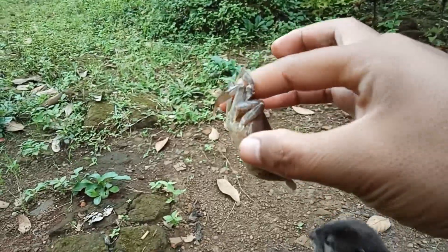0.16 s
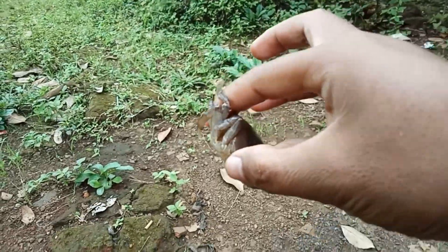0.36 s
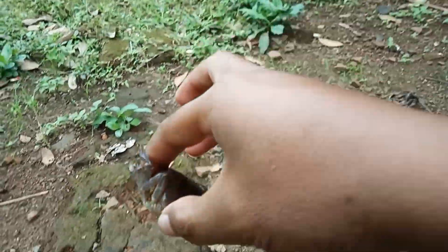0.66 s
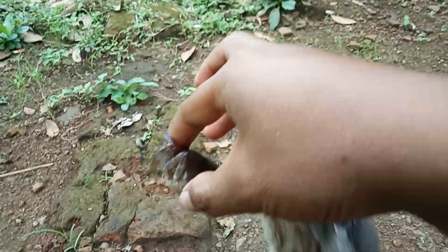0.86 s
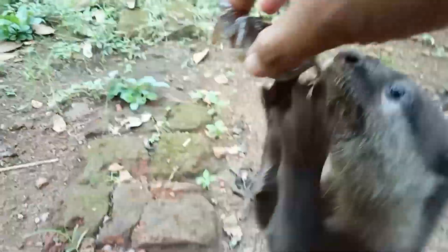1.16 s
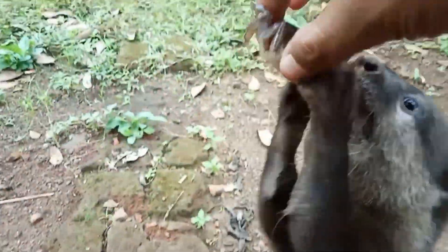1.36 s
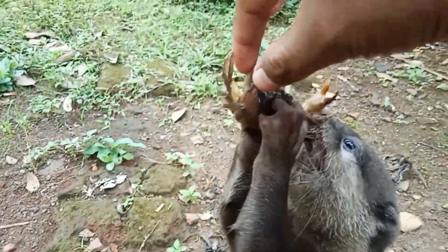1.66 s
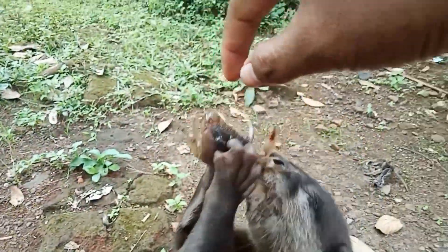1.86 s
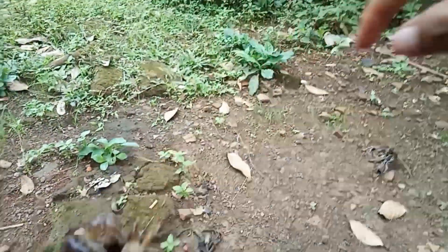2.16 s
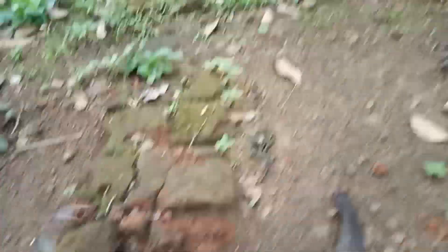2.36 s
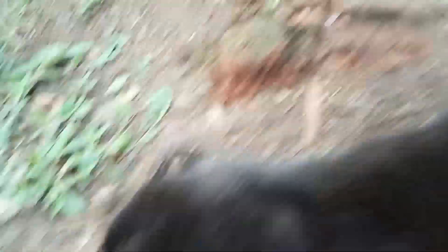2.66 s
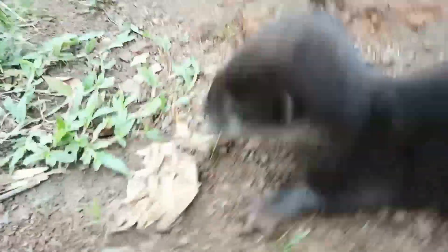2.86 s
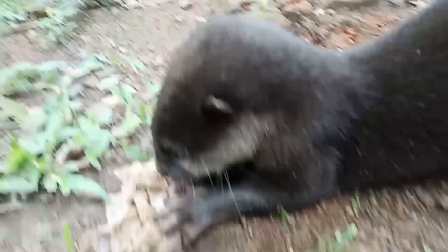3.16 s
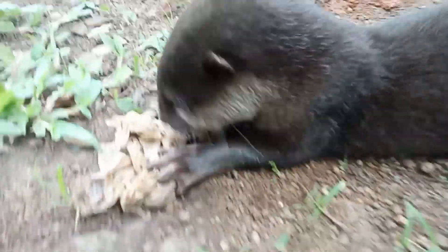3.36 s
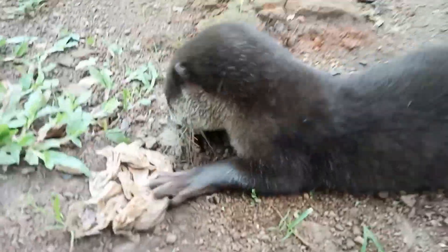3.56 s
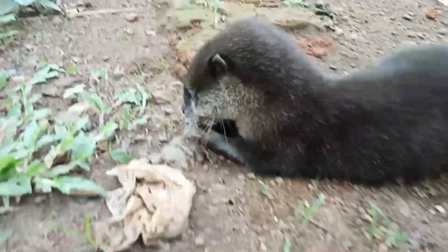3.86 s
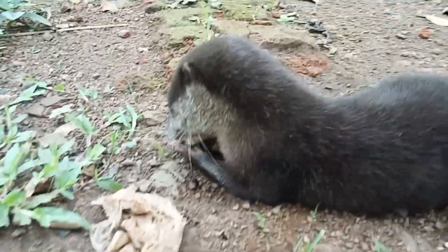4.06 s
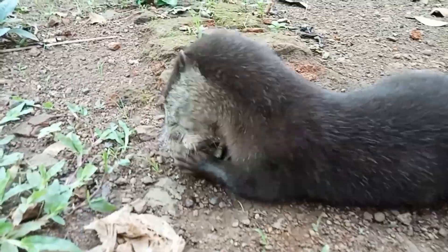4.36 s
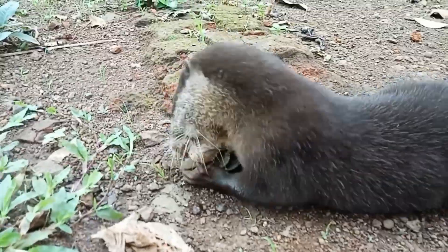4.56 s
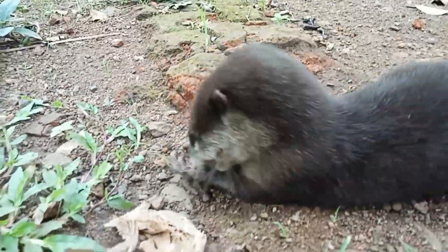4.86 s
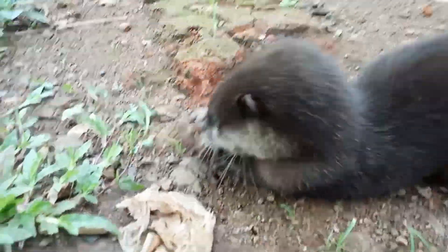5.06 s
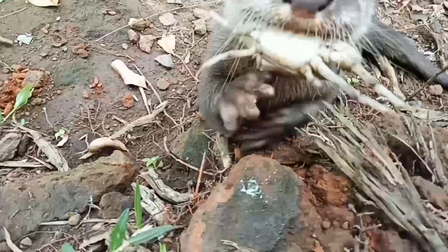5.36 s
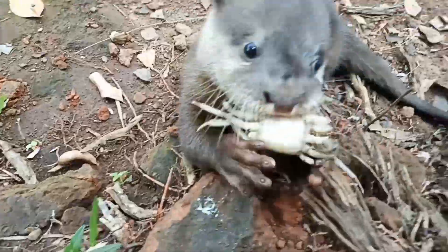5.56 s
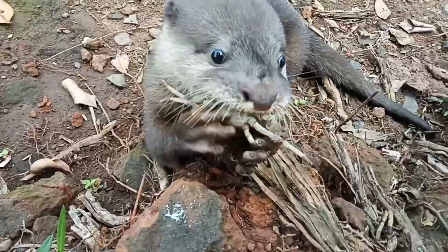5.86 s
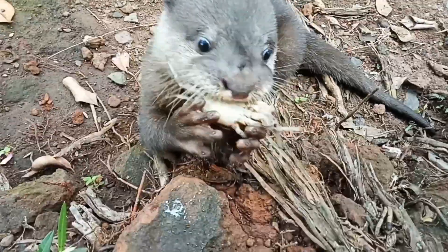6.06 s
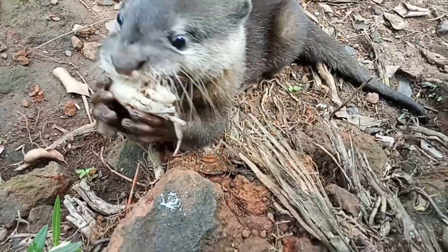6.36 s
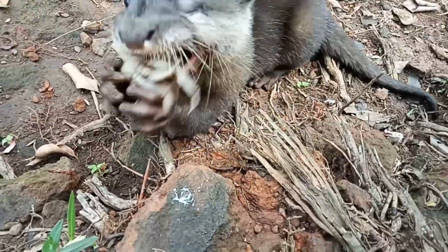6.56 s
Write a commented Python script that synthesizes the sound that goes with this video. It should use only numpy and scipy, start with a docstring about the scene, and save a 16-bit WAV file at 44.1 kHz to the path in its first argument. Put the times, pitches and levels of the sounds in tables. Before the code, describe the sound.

A few dry scrapes over quiet garden air lead to one piercing, swooping otter squeal, under a second long, ending in a raspy cracked yelp. The background is then fuller, with rumble, hiss, faint whine and far engine pulses. Paws scuff, a weak chirp slides down, something bumps softly. The air cuts out briefly, then close crisp cracks, crumbs and wet little smacks in a calmer spot.

```python
"""Garden, close microphone: a small otter begs for food and scuffs the dry ground from the start.
At 1.5 s a long swooping squeal, a whistle sliding through fixed resonances, cracks into a harsh yelp.
More scuffs, a faint falling chirp at 4.3 s and a soft bump follow, all noise bursts but the chirp.
Behind are rumble, high hiss, a thin far whine of tone and noise, and a distant engine's pulsed booms.
They fade by 5.33 s; after a short gap, in quieter air, bites, crumbs and chewing ring as noise bursts."""
import sys
import numpy as np
from scipy import signal
from scipy.fft import rfft, irfft, next_fast_len
from scipy.io import wavfile
from scipy.ndimage import uniform_filter1d

SR = 44100
rng = np.random.default_rng(int(sys.argv[2]) if len(sys.argv) > 2 else 0)


def master(y):
    """Save y as 16-bit WAV."""
    cut = np.clip(np.atleast_2d(y).T, -1, 1)
    pcm = np.round(cut * 32767)  # scale
    wavfile.write(sys.argv[1], SR, pcm.astype(np.int16))


N = 295504
TIME = np.arange(N) / SR

# Levels in the tables are taken before the trims and resonances in the functions.
# The squeal is held high, dips into a warble, climbs again and plunges: [t/s, f/Hz before any crack]
SQUEAL_PITCH = [(1.513, 5000), (1.538, 7610), (1.555, 7540), (1.573, 6380), (1.615, 6500), (1.682, 6580),
                (1.712, 7450), (1.739, 7810), (1.757, 6320), (1.797, 4270), (1.839, 3500), (1.859, 2763),
                (1.903, 2690), (1.934, 3570), (1.949, 3086), (1.961, 3390), (1.971, 3260), (2.000, 4120),
                (2.032, 3596), (2.08, 4385), (2.105, 5050), (2.143, 4950), (2.174, 6080), (2.19, 5930),
                (2.225, 3920), (2.259, 2360), (2.286, 2302), (2.32, 1865), (2.361, 1638), (2.369, 1840),
                (2.375, 1760)]
# How hard the squeal is pushed: [t/s, level/dB]
SQUEAL_EFFORT = [(1.51, -38), (1.56, -28), (1.615, -20), (1.69, -30), (1.745, -28.5), (1.81, -25.5),
                 (1.9, -23), (1.92, -24.5), (2.055, -21.5), (2.066, -30), (2.2, -21), (2.238, -17),
                 (2.249, -9.5), (2.258, -19.5), (2.284, -15), (2.295, -17), (2.31, -15), (2.318, -23.5),
                 (2.366, -27.5), (2.378, -36.5)]
# The chirp flicks up and slides down: [t/s, f/Hz, level/dB]
CHIRP = [(4.306, 4910, -35), (4.328, 7040, -43.5), (4.342, 6440, -48), (4.366, 6150, -34),
         (4.39, 5550, -38), (4.41, 5300, -38), (4.437, 3710, -42.5), (4.467, 3650, -45.5),
         (4.488, 2900, -39), (4.505, 2730, -51), (4.521, 2460, -37.5), (4.538, 2210, -48)]
# Fixed resonances that each harmonic slides through: [f/Hz, level/dB]
VOICE_COLOUR = [(1100, -3.5), (1700, 0.5), (2300, 4.5), (2750, 7), (3200, 0.5), (4100, -3), (4500, -15),
                (5350, -22), (5900, -5.5), (6450, 1), (7600, -3), (8800, -5), (11000, -13.5), (13500, -15),
                (15500, -14.5)]
# Rasp in the throat: [f/Hz, relative level/dB per Hz]
RASP = [(1100, -44), (1700, -22), (2400, 8), (3500, 3), (4800, -17), (6300, -6.5), (7800, -20),
        (10000, -12.5), (15500, -33)]
# Hoarse stretches: [start t/s, end t/s, roughness added (0-1)]
HOARSE = [(1.517, 1.55, 0.13), (1.772, 1.787, 0.02), (2.081, 2.158, 0.4), (2.203, 2.243, 0.4),
          (2.25, 2.294, 0.4), (4.303, 4.535, 0.06)]
# The voice cracks upward and gains tones at half pitch:
# [start t/s, end t/s, change of level/dB, half-pitch tone level/dB]
CRACKS = [(2.267, 2.274, -3, -4), (2.288, 2.383, 1.5, -11)]
CRACK_RATIO = 1.333  # about a fourth up
CLEAR_ROUGHNESS, HOARSE_ONSET_S, VOICE_ONSET_S = 0.021, 0.015, 0.0092
RELAXED_HZ, TENSION_DB_PER_OCTAVE = 3200, 16.5  # upper harmonics brighten as the pitch rises

# Scuffs of paws and food: [peak t/s, level/dB, attack/s, 60 dB decay/s]
SCUFFS = [(.037, -36.5, 0.046, 0.21), (0.542, -34, .002, 0.029), (.792, -35, .016, 0.14),
          (0.825, -29.5, 0.0035, 0.12), (1.368, -30.5, 0.0014, 0.12), (2.615, -33.5, 0.0088, .19),
          (2.75, -32.5, .012, .17), (2.776, -28, 0.019, 0.094), (5.468, -32, 0.015, .1)]
# Grit of the scuffs: [f/Hz, relative level/dB per Hz]
SCUFF_COLOUR = [(800, -32), (1500, -1), (2100, 9.5), (3200, 18), (4800, -3.5), (6500, -8.5), (8500, -20),
                (15000, -30)]
# Bites: [t/s, level/dB, brightest f/Hz]
BITES = [(5.484, -32, 3000), (5.819, -36, 3970), (5.869, -34.5, 2400), (6.039, -34.5, 2540),
         (6.127, -41.5, 3600), (6.145, -41, 2400), (6.158, -44, 2400), (6.207, -46, 6400),
         (6.225, -35.5, 3660), (6.328, -36.5, 3100), (6.371, -35, 2900), (6.675, -39.5, 2100)]
# Resonances of the cracking food: [f/Hz, width/Hz, level/dB]
CRACK_MODES = [(2340, 540, -1), (3860, 1060, -3.5), (6400, 870, -4)]
BITE_FALL_DB_PER_OCTAVE = 13.5  # away from the brightest pitch
SPLINTER_S, SPLINTER_DB = 0.006, -10  # delay and relative level
CRUMBS_PER_S, CRUMB_DB, CRUMB_SPREAD_DB = 15, -54, 3  # spread is either way
# Smacks of the jaw: [t/s, level/dB]
CHEWS = [(5.488, -47.5), (5.665, -49), (5.86, -48.5), (6.039, -47), (6.225, -51), (6.375, -50.5),
         (6.52, -68), (6.672, -46.5)]
# Resonances of the mouth: [f/Hz, width/Hz, level/dB]
MOUTH_MODES = [(473, 180, -4), (816, 140, -3.5)]
# Soft bump on the ground, one row: [t/s, level/dB, 60 dB decay/s]
BUMP = (4.78, -40, 0.1)

# Garden air: [t/s, rumble level/dB, hiss level/dB]
AIR = [(0, -51, -52), (1.42, -51, -52.5), (1.98, -43.5, -43.7), (2.22, -44.5, -44), (2.42, -46.8, -48.5),
       (3.5, -45.5, -49.6), (4.2, -46.5, -49), (5.05, -42.5, -46.3), (5.3, -49, -50.5)]
# Low rumble: [f/Hz, relative level/dB per Hz]
RUMBLE = [(41, -47), (70, -11), (91, -1), (119, -4.5), (227, 2), (300, -3), (419, -4.5), (600, -10.5),
          (733, -13.5), (1090, -18), (1230, -27.5), (1700, -34.5), (2210, -34), (3740, -120)]
# The rumble grows fuller in its upper part: [t/s, change of level/dB]
RUMBLE_BODY = [(2.4, -2), (2.9, 1)]
BODY_HZ, BODY_WIDTH_HZ = 438, 99
# Parts of the rumble that swell and sink on their own: [f/Hz]
LUMP_HZ = (125.7, 242, 427)
LUMP_DEPTH, LUMPS_PER_S = 0.37, 5.9
# High hiss: [f/Hz, relative level/dB per Hz]
HISS = [(1100, -9.5), (1500, -6.5), (2100, -2.5), (3100, -0.5), (3900, -5), (4700, -15.5), (5400, -22.5),
        (6300, -21), (7500, -31.5), (10000, -39)]
# Faint air at the very top: [f/Hz, relative level/dB per Hz]
TOP_AIR = [(5000, -21), (6300, 11.5), (8000, -4), (11500, -4), (15500, -3)]
# Its course: [t/s, level/dB]
TOP_LEVEL = [(1.6, -80), (2.1, -73), (2.55, -80), (3.15, -72.5), (5.1, -70), (5.3, -77)]
# The far whine swells now and then: [start t/s, end t/s, level/dB]
WHINE_SWELLS = [(-.1, .33, -63), (1.623, 2.25, -49.5), (2.42, 2.964, -53.5), (4.204, 5.15, -58.5)]
WHINE_HZ, WHINE_WIDTH_HZ, WHINE_REST_DB, WHINE_RAMP_S = 1889, 23, -62.5, 0.3
FIRING_HZ = 9.58
ENGINE_DB, ENGINE_FOLLOWS = -57, 1.3  # level at mean hiss; dB for each dB that the hiss swells
# Quieter place where it eats: [f/Hz, relative level/dB per Hz]
FEEDING_AIR = [(30, -42), (70, -4.5), (130, 5), (300, 1.5), (550, -7.5), (900, -10), (1450, -17.5),
               (2400, -7.5), (3800, -11), (5200, -28), (6400, -27), (8000, -39.5), (10500, -44),
               (15500, -44)]
FEEDING_AIR_DB = -47
FADE_S, SILENT_S, RESUME_S = 5.255, 5.325, 5.406
CUTOFF_HZ = 15500


def voice(melody, effort_db, jitter, octave_db, upper_db, step_db, rasp_db,
          beat_hz=560, beat_depth=0.35, half_step_db=-10.5, rough_jitter=0.048,
          shimmer=0.02, strain_db=8, rasp_follows=0.62):
    """A nearly pure whistle sliding through fixed resonances; under strain the folds beat, rasp and crack."""
    hoarse = sum(r * gate(start, end, HOARSE_ONSET_S) for start, end, r in HOARSE)
    rough = np.clip(CLEAR_ROUGHNESS + hoarse, 0, 1)
    pitch = uniform_filter1d(in_time(melody)[0], size=300)
    sounding = gate(melody[0][0], melody[-1][0] + VOICE_ONSET_S / 2, VOICE_ONSET_S)
    level = from_db(effort_db + 1.2 * drift(100)) * sounding

    half = 0
    for start, end, change_db, half_db in CRACKS:
        cracked = gate(start, end, 0.002)
        pitch = pitch * CRACK_RATIO ** cracked
        level = level * from_db(change_db * cracked)
        half = half + from_db(half_db) * cracked

    rough_wobble = drift(160) + 2.0 * rough * drift(900)
    wobble = jitter * drift(140) + rough_jitter * rough * rough_wobble
    phase = 2 * np.pi * np.cumsum(pitch * (1 + wobble)) / SR

    # (multiple of the pitch, gain): harmonics, then the lines midway between them as the period doubles
    octave = from_db(octave_db + strain_db * rough + 2.0 * drift(80))
    tension_db = TENSION_DB_PER_OCTAVE * np.log2(pitch / RELAXED_HZ)
    upper = from_db(upper_db + tension_db + 2 * drift(60))
    partials = [(1, 0.98), (2, octave)]
    partials += [(k + 3, upper * from_db(step_db * k)) for k in range(3)]
    partials += [(k + 0.5, half * from_db(half_step_db * abs(k - 0.6))) for k in range(5)]
    tone = np.zeros(N)
    for multiple, gain in partials:
        hz = multiple * pitch
        tone += gain * colour(hz) * (hz < SR / 2) * np.sin(multiple * phase)

    # the two folds fall out of step and beat at an unsteady rate
    beat = np.sin(2 * np.pi * np.cumsum(beat_hz * (1 + 0.41 * drift(200))) / SR)
    flutter = 1 + rough * (beat_depth * beat + 0.4 * drift(300)) + shimmer * drift(900)
    rasp = from_db(rasp_db) * rough * colour(pitch) ** rasp_follows * noise(RASP)
    return level * flutter * (np.sqrt(2) * tone + rasp)


def colour(hz):
    """Gain of the voice's resonances at a frequency."""
    points, db = np.transpose(VOICE_COLOUR)
    return from_db(np.interp(hz, points, db))


def scuffs(grains_per_s=300, level_db=-9, grain_db=2):
    """Each scuff is a short spill of gritty grains: noise that rises, falls and flickers."""
    envelope = np.zeros(N)
    for s, db, attack, decay in SCUFFS:
        rise = (TIME < s) * np.clip(1 + (TIME - s) / attack, 0, 1)
        envelope += from_db(db) * (rise + burst(s, decay))
    grit = rms_one(noise(SCUFF_COLOUR) * from_db(grain_db * drift(grains_per_s)))
    return from_db(level_db) * envelope * grit


def bites(crack_s=0.012, level_db=8):
    """Each bite is a crack and a weaker splinter that ring the food's three broad resonances."""
    out = np.zeros(N)
    splinter = from_db(SPLINTER_DB)
    cracks = [burst(s, crack_s) + splinter * burst(s + SPLINTER_S, crack_s) for s, _, _ in BITES]
    for hz, width_hz, mode_db in CRACK_MODES:
        envelope = np.zeros(N)
        for (_, db, bright_hz), crack in zip(BITES, cracks):
            octaves_away = abs(np.log2(hz / bright_hz))
            envelope += from_db(db - BITE_FALL_DB_PER_OCTAVE * octaves_away) * crack
        struck = envelope * narrow_noise(hz, 2 * width_hz)
        out += from_db(mode_db + level_db) * resonate(struck, hz, width_hz)
    return out


def crumbs(decay_s=0.011):
    """Bits of shell give way at random while the otter eats: tiny bursts in the food's resonances."""
    eating_s = N / SR - RESUME_S
    envelope = np.zeros(N)
    for when, size in rng.random((int(CRUMBS_PER_S * eating_s), 2)):
        db = CRUMB_DB + CRUMB_SPREAD_DB * (2 * size - 1)
        envelope += from_db(db) * burst(RESUME_S + when * eating_s, decay_s)
    return envelope * sum(from_db(db) * narrow_noise(hz, 2 * width_hz) for hz, width_hz, db in CRACK_MODES)


def chewing(smack_s=0.021, opening_per_s=5):
    """Each smack stirs the hollow of the mouth, whose resonances rise as the jaw opens."""
    out = np.zeros(N)
    hollow = sum(from_db(db) * narrow_noise(hz, width_hz) for hz, width_hz, db in MOUTH_MODES)
    for s, db in CHEWS:
        near = np.abs(TIME - s) < 0.07
        age = TIME[near] - s
        # reading the noise ever faster raises its pitch
        read_at = s + age + opening_per_s * age ** 2 / 2
        out[near] += from_db(db) * np.exp(-(age / smack_s) ** 2) * np.interp(read_at, TIME, hollow)
    return out


def bump(hz=380, width_hz=600):
    """A dull knock on soft earth: a decaying burst of broad low noise."""
    s, db, decay = BUMP
    knock = burst(s, decay) * narrow_noise(hz, width_hz)
    return from_db(db) * resonate(knock, hz, 2 * width_hz)


def outdoors(x, scatter_db=-40, t60=0.27):
    """Ground and foliage scatter a faint short tail behind the close sound."""
    age = TIME[:SR // 2]
    tail = rng.standard_normal(len(age)) * from_db(-60 * age / t60) * (age > 0.003)
    tail = tail / np.linalg.norm(tail)
    return x + from_db(scatter_db) * signal.fftconvolve(x, tail)[:N]


def garden(rumble_db=1.07, hiss_db=1, top_db=1):
    """Lumpy far rumble with the engine in it, a high hiss and a thin wavering whine."""
    rumble, hiss = in_time(AIR)
    throb = from_db(ENGINE_DB + ENGINE_FOLLOWS * (hiss - hiss.mean())) * engine()
    even = noise(RUMBLE)
    lumps = sum(LUMP_DEPTH * drift(LUMPS_PER_S) * resonate(even, hz, hz / 2) for hz in LUMP_HZ)
    body_gain = from_db(in_time(RUMBLE_BODY)[0])
    body = (body_gain - 1) * resonate(even, BODY_HZ, BODY_WIDTH_HZ)
    low = from_db(rumble + rumble_db + 0.52 * drift(23)) * (even + lumps + body)
    high = from_db(hiss + hiss_db + 0.4 * drift(23)) * noise(HISS)
    top = from_db(in_time(TOP_LEVEL)[0] + top_db) * noise(TOP_AIR)
    return low + throb + high + top + whine()


def whine(waver_hz=11, blur_db=1):
    """A thin far tone, wavering and blurred by narrow noise, that swells and sinks back."""
    swells = sum(from_db(db) * gate(start, end, WHINE_RAMP_S) for start, end, db in WHINE_SWELLS)
    tone = np.sin(2 * np.pi * np.cumsum(WHINE_HZ + waver_hz * drift(30)) / SR)
    blur = from_db(blur_db) * narrow_noise(WHINE_HZ, 2 * WHINE_WIDTH_HZ)
    return (from_db(WHINE_REST_DB) + swells) * rms_one(tone + blur)


def engine(first_s=0.073, boom_hz=68, boom_width_hz=35, exhaust_hz=98, exhaust_width_hz=50):
    """Slow firings of a far idling engine, each a dull boom of uneven strength."""
    firings = np.diff(np.floor((TIME - first_s) * FIRING_HZ), prepend=0) > 0
    pulses = firings * from_db(0.82 * drift(14))
    boom = resonate(pulses, boom_hz, boom_width_hz)
    return rms_one(resonate(boom, exhaust_hz, exhaust_width_hz))


def feeding_air():
    """Soft, slightly drifting noise of the quieter place where the otter eats."""
    return from_db(FEEDING_AIR_DB + 0.5 * drift(4.0)) * noise(FEEDING_AIR) * (TIME > RESUME_S)


def from_db(db):
    """Decibels to gain."""
    return 10 ** (np.asarray(db) / 20)


def rms_one(x):
    """Scale to unit power."""
    return x / np.sqrt(np.mean(np.abs(x) ** 2) + 1e-20)


def in_time(rows):
    """Each column of a curve table at every sample."""
    s, *columns = np.transpose(rows)
    return [np.interp(TIME, s, c) for c in columns]


def gate(start, end, edge):
    """1 between two times, with straight ramps of the given length centred on them."""
    return np.clip(np.minimum(TIME - start, end - TIME) / edge + 0.5, 0, 1)


def burst(start, decay):
    """Envelope that jumps to 1 and falls 60 dB in the decay time."""
    age = TIME - start
    live = (age >= 0) & (age < 2 * decay)
    out = np.zeros(N)
    out[live] = from_db(-60 * age[live] / decay)
    return out


def drift(rate):
    """Random wander of unit spread, up to the given rate a second."""
    lowpass = signal.butter(4, rate, fs=SR, output="sos")
    slow = signal.sosfilt(lowpass, rng.standard_normal(N + SR))
    return rms_one(slow[SR:])  # the first second lets the filter settle


def noise(spectrum):
    """Unit noise with a spectrum of (f/Hz, level/dB) points, falling 24 dB an octave beyond both ends."""
    hz, db = np.transpose(spectrum)
    size = next_fast_len(N)
    octave = np.log2(np.maximum(np.fft.rfftfreq(size, 1 / SR), 1))
    points = np.log2(hz)
    outside = np.abs(octave - np.clip(octave, points[0], points[-1]))
    gain = from_db(np.interp(octave, points, db) - 24 * outside)
    return rms_one(irfft(rfft(rng.standard_normal(size)) * gain, size)[:N])


def resonate(x, hz, width_hz):
    """A two-pole resonance with a gain of about 1 on its top."""
    r = np.exp(-np.pi * width_hz / SR)
    zeros = np.array([1, 0, -1]) * (1 - r * r) / 2
    poles = [1, -2 * r * np.cos(2 * np.pi * hz / SR), r * r]
    return signal.lfilter(zeros, poles, x)


def narrow_noise(hz, width_hz):
    """Unit noise rung twice through one resonance."""
    once = resonate(rng.standard_normal(N), hz, width_hz)
    return rms_one(resonate(once, hz, width_hz))


def scene():
    """The otter calls and scuffs in the garden, which fades out; after a short gap it is chewing."""
    squeal = voice(SQUEAL_PITCH, in_time(SQUEAL_EFFORT)[0], jitter=0.0026,
                   octave_db=-19.5, upper_db=-34, step_db=-3.5, rasp_db=-3)
    chirp = voice(CHIRP, in_time(CHIRP)[1], jitter=0.00844,
                  octave_db=-15.5, upper_db=-25, step_db=-8, rasp_db=-9)
    eating = bites() + crumbs() + chewing()
    otter = outdoors(squeal + chirp + scuffs() + eating + bump())
    fade = np.clip((SILENT_S - TIME) / (SILENT_S - FADE_S), 0, 1)
    return (otter + fade * garden() + feeding_air())[None]


def record(dry):
    """The microphone signal: the highest peaks are clipped, then a steep low-pass cuts the top."""
    lowpass = signal.ellip(10, 0.1, 80, CUTOFF_HZ, fs=SR, output="sos")
    return signal.sosfilt(lowpass, np.clip(dry, -0.85, 0.85))


dry = scene()
out = record(dry)
master(out)
```